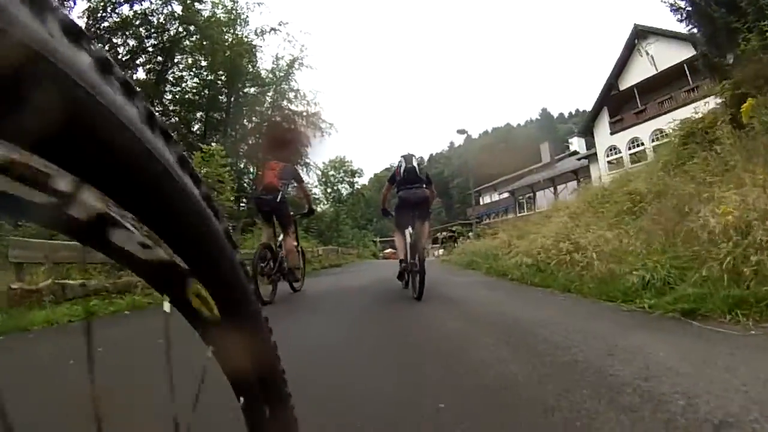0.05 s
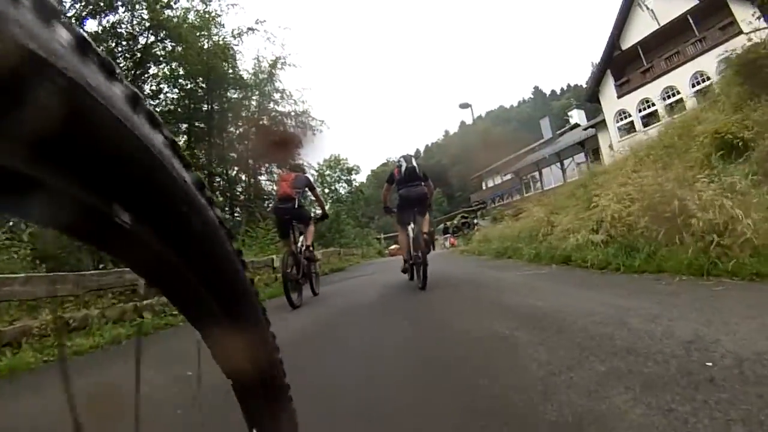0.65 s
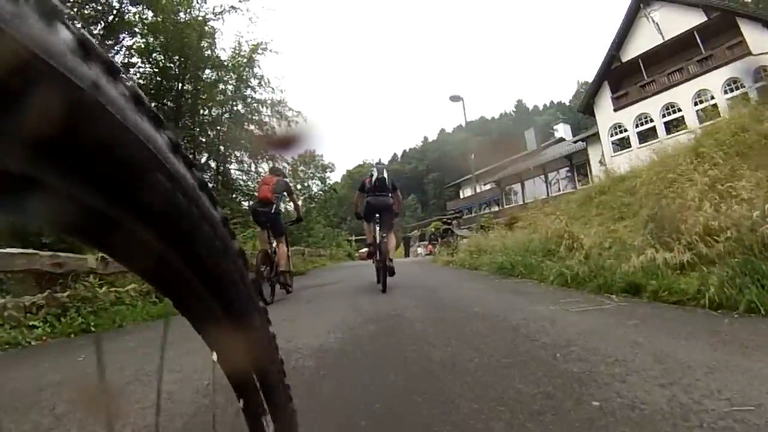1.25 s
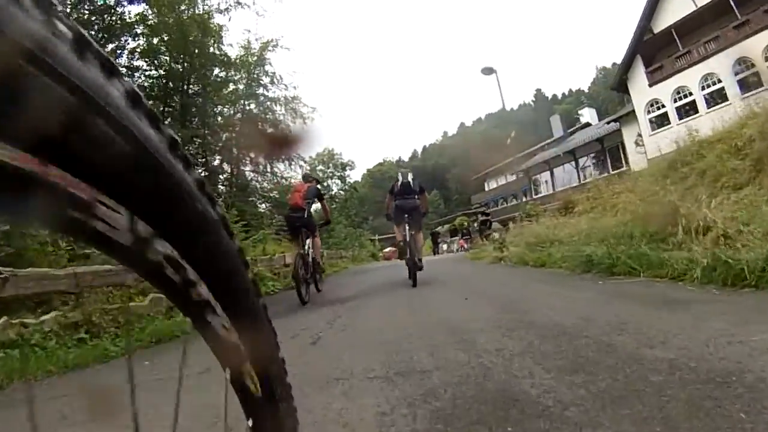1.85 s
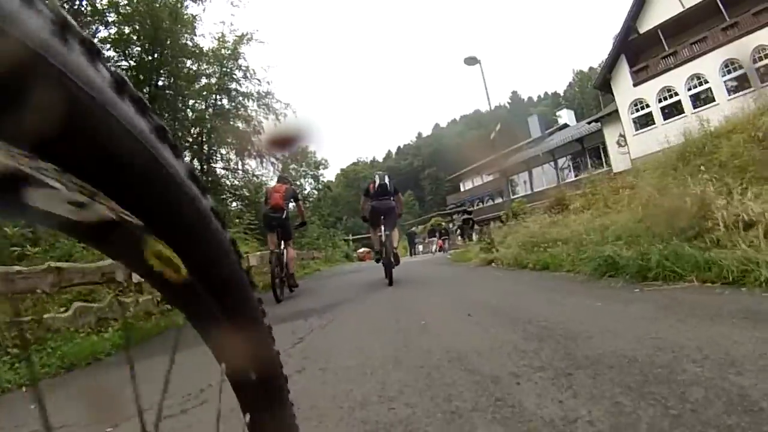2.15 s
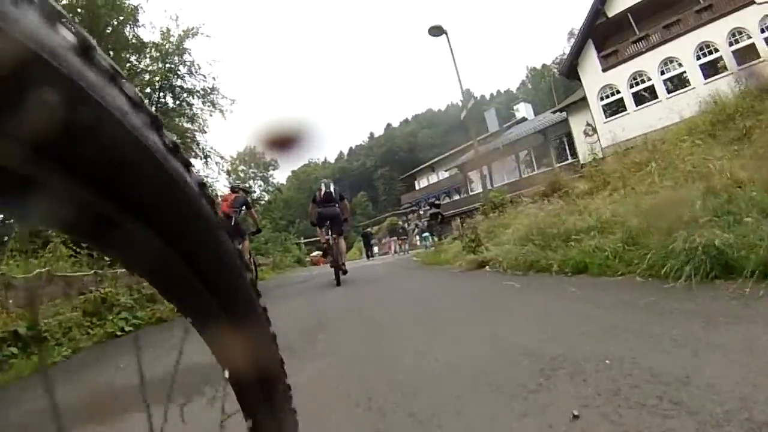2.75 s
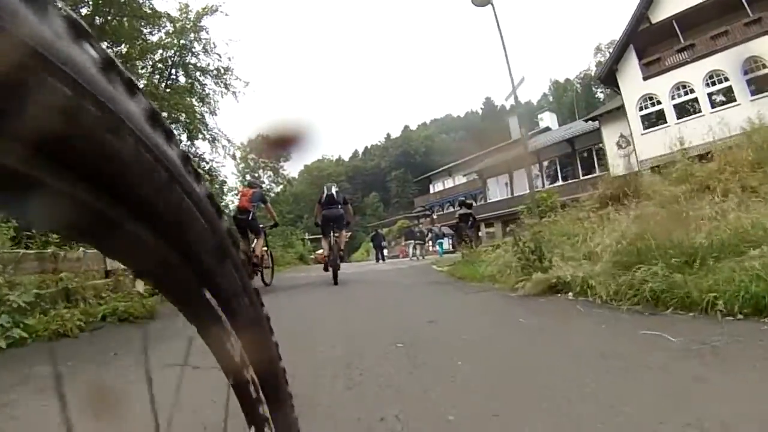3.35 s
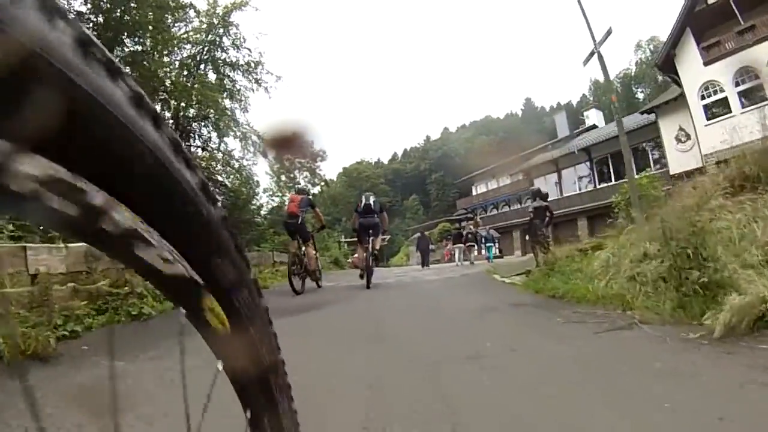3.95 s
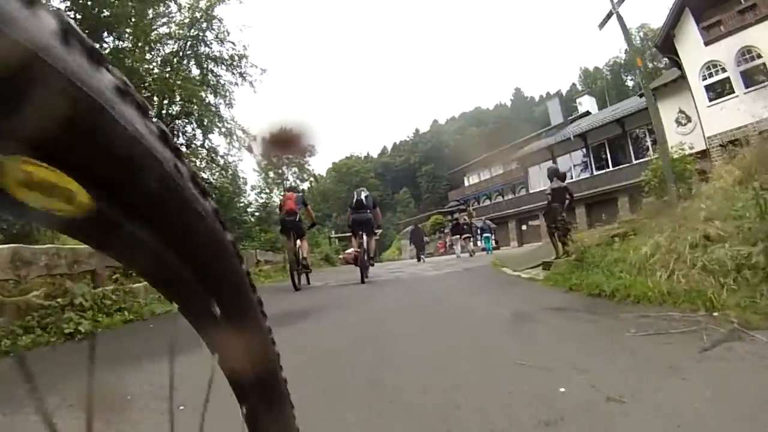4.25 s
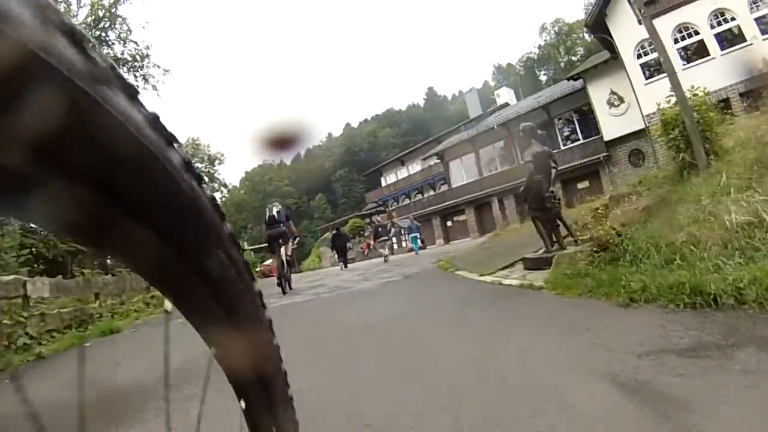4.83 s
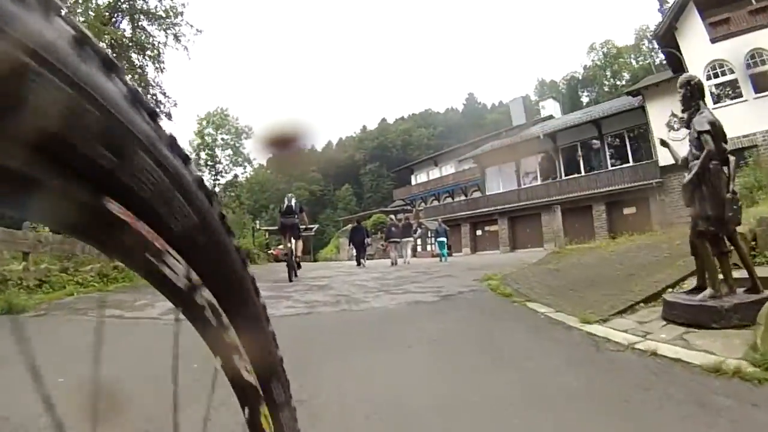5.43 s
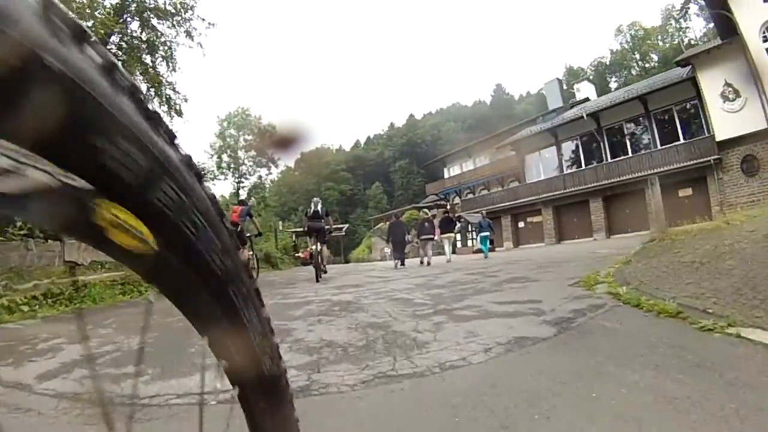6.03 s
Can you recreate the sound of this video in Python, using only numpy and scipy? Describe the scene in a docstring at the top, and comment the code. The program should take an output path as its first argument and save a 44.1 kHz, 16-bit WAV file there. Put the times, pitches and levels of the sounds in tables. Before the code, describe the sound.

Close beside a rolling bicycle wheel: low tyre hum, rapid rattling knocks, a creaking mount and rushing wind, with occasional grit clinking.

```python
"""A mountain bike rolls along a paved road, a camera fixed low beside its front wheel.
From the start the tyre's knobs drone, wind rushes over the microphone and the mount creaks.
Sharp crackling knocks come throughout; the camera's gain control ducks for an instant after each.
Grit pings off the frame, clearly at 1.5 s, at 2.7 s with a crunch of sand, and loudest at 4.2 s.
Rough patches shake the fork all along, hardest near 4.9 s; the casing growls once more at 5.9 s."""
import sys
import numpy as np
from scipy import signal
from scipy.fft import rfft, irfft, next_fast_len
from scipy.io import wavfile
from scipy.ndimage import uniform_filter1d, map_coordinates

SR = 44100
rng = np.random.default_rng(int(sys.argv[2]) if len(sys.argv) > 2 else 0)


def pcm_store(signal):
    """Save signal as 16-bit PCM."""
    levels = np.round(np.clip(np.atleast_2d(signal), -1, 1) * 32767)
    wavfile.write(sys.argv[1], SR, levels.astype(np.int16).T)


N = 272979

# wind strength: time_s, level_db
WIND_STRENGTH = [(0.03, -52.5), (0.27, -50), (0.64, -53.5), (0.78, -51), (2.14, -53), (2.65, -50.5),
                 (2.98, -52), (3.39, -51.5), (3.91, -53), (4.48, -55), (4.78, -50), (5.06, -50.5),
                 (5.54, -53), (5.74, -57), (6.03, -49), (6.15, -57)]
# wind over the microphone: freq_hz, density_db
RUSH_SPECTRUM = [(150, 6), (400, -10), (620, -3), (900, 6), (1200, 5.5), (1450, -6), (1900, -8),
                 (2250, -17.5), (2650, -25), (2950, -21), (3350, -31.5), (4000, -34.5), (5500, -42),
                 (10000, -47.5), (13000, -54.5)]
# wind on the microphone port: freq_hz, density_db
BUFFET_SPECTRUM = [(10, -43.5), (24, -6), (45, -20), (110, -2), (180, 10.5), (400, -33), (1000, -84)]
# mount creak: freq_hz, density_db
CREAK_SPECTRUM = [(300, -3), (1400, 17.5), (3000, 11.5), (5000, 1), (7500, -10), (10300, -15.5),
                  (15000, -45)]
# faint ticks and sand grains: freq_hz, density_db
TICK_SPECTRUM = [(300, -9), (1500, 22.5), (3000, 11), (4500, 0.5), (6000, -8.5), (8000, -10), (10300, -18),
                 (12000, -32.5), (15000, -44.5)]
# surges of ticking and creak: centre_s, rise_db
TICK_SURGES = [(0.088, 7.5), (0.174, 8), (0.348, 6.5), (0.644, 5), (0.844, 5.5), (0.959, 7.5), (1.135, 5),
               (1.412, 4), (1.951, 9), (2.02, 2.5), (2.177, 11), (2.278, 9.5), (2.739, 6.5), (3.065, 7.5),
               (3.799, -1), (3.918, 8), (4.589, 5), (5.02, 5), (5.137, 7.5), (5.228, 4), (5.525, 6.5),
               (5.935, 3)]
# sand under the tread: centre_s, level_db
SAND_SCRAPES = [(1.15, -59), (2.19, -60.5), (2.751, -53), (5.009, -63), (5.13, -66.5), (5.931, -62.5)]
# stones on the frame: start_s, strength_db
GRIT_HITS = [(0.141, -45.5), (0.334, -49), (0.845, -51), (1.122, -50), (1.467, -41), (2.7317, -38.5),
             (2.7687, -48), (3.913, -52), (4.079, -54), (4.2066, -35.5), (4.592, -49), (4.9869, -39),
             (5.774, -53), (5.926, -48.5)]
# frame ring: freq_hz, width_hz, gain_db
FRAME_MODES = [(1530, 330, -5), (1770, 220, -2), (2970, 500, -22)]
# fork and mount, deep boom first: freq_hz, width_hz, gain_db
FORK_MODES = [(137.9, 22, 8.5), (172.3, 36, 2.5), (202.4, 31, -1.5), (252.8, 34, 0), (289, 46, -0.5),
              (331.2, 33, -7.5)]
# slow shudder of wheel and fork: freq_hz, width_hz, gain_db
SHUDDER_MODES = [(31.56, 3, 4), (60.9, 8.6, -13), (87.7, 10, 0.5)]
# hollow tyre casing: freq_hz, width_hz, gain_db
CASING_MODES = [(431.8, 40, 3), (503.4, 48, -6), (605.5, 80, -19.5)]
# casing over bumps: centre_s, rise_db
CASING_GROWLS = [(0.23, 9), (0.295, 8.5), (0.523, 7.5), (0.703, 6), (0.766, 8), (0.828, 5.5), (0.915, 7),
                 (1.246, 4.5), (1.414, 5), (1.573, 8), (1.799, 12), (2.186, 7.5), (2.276, 4), (2.376, 7.5),
                 (2.592, 4.5), (2.859, 3.5), (3.195, 6.5), (3.33, 9.5), (3.586, 8), (3.798, 5.5),
                 (3.863, 8), (4.161, 5), (4.442, 4.5), (4.596, 10.5), (4.679, 7.5), (4.84, 10), (4.91, 9.5),
                 (5.109, 8), (5.24, 6.5), (5.368, 6), (5.92, 11.5), (6.155, 5)]
# rough asphalt: centre_s, boom_rise_db, shake_rise_db
ROUGH_PATCHES = [(0.26, -3.5, 8), (0.409, 7.5, 1.5), (0.60, -0.5, 0), (0.772, 1, 4), (0.858, 12, -1),
                 (1.351, 4.5, 5.5), (1.60, 9, 2.5), (1.8, 1, 5.5), (2.111, 9, -3), (2.4, 4.5, 3.5),
                 (2.87, 0, 0.5), (3.33, 3.5, 6), (3.857, -1, 6.5), (4.18, 3.5, 6), (4.659, 10, 4.5),
                 (4.871, 8.5, 13.5), (5.118, 9, 1.5), (5.28, 5.5, 3.5), (5.392, 2.5, 7.5), (5.899, 3, 4)]
# tread drone: time_s, pitch_hz
TREAD_PITCH = [(0.05, 176), (0.9, 181.9), (0.95, 169.2), (1.41, 177.1), (1.61, 143), (1.75, 165.8),
               (1.8, 140), (1.88, 187.7), (1.95, 166.3), (2.7, 176.7), (3.28, 163.5), (3.34, 147.4),
               (3.45, 161.3), (3.89, 160.5), (3.94, 184.4), (4.08, 169.4), (5.06, 176.6), (5.28, 143.6),
               (5.35, 162.1), (5.88, 174.9), (5.95, 152.8), (6.15, 169)]
# tread load on the road: time_s, level_db
TREAD_LOAD = [(0.0, -37.5), (0.03, -30), (0.1, -35), (0.24, -22.5), (0.27, -38), (0.31, -26), (0.52, -33),
              (0.53, -23.5), (0.71, -31.5), (0.74, -24.5), (0.96, -33.5), (1.0, -37), (1.08, -33),
              (1.14, -38), (1.28, -22), (1.31, -34.5), (1.36, -23.5), (1.55, -27.5), (1.57, -36.5),
              (1.67, -30.5), (1.71, -39.5), (2.14, -24.5), (2.17, -31.5), (2.22, -26), (2.28, -39),
              (2.38, -24.5), (2.83, -34.5), (2.86, -26.5), (3.0, -26), (3.07, -41), (3.1, -25), (3.21, -31),
              (3.22, -22.5), (3.29, -25), (3.38, -35.5), (3.45, -23.5), (3.5, -27), (3.53, -41),
              (3.64, -27), (3.65, -31), (3.69, -23), (3.79, -23.5), (3.83, -33), (4.38, -26.5),
              (5.07, -32.5), (5.1, -24), (5.31, -38.5), (5.36, -27), (5.66, -23), (5.67, -31.5),
              (5.77, -24), (5.88, -35.5), (5.98, -26), (6.02, -36.5), (6.05, -28.5), (6.19, -28)]
# crackle on each knock: freq_hz, density_db
CRACKLE_SPECTRUM = [(300, -5.5), (600, 12.5), (1100, 26.5), (1600, 22), (3000, 8.5), (5000, -1),
                    (7500, -13), (10300, -8), (12000, -21.5), (15000, -34)]
# brightest snaps in the crackle: freq_hz, density_db
SNAP_SPECTRUM = [(3000, -22), (6000, 2.5), (8000, -2), (10300, -11.5), (12000, -16), (15000, -33)]
# sharp crackling knocks: time_s, thump_db, softness_ms, crackle_db (before the cap), snap_db
SHARP_KNOCKS = [(0.0383, -14.5, 0.34, -28.5, -70.0), (0.0699, -16, 0.33, -44.5, -64.5),
                (0.0877, -24.5, 0.2, -52.5, -67), (0.1062, -12, 0.06, -46.5, -60),
                (0.1419, -19.5, 0.31, -39, -71), (0.1775, -20.0, 0.31, -46.5, -59),
                (0.2136, -19.5, 0.49, -47, -73), (0.2466, -14, 0.38, -42.5, -68),
                (0.29, -24, 0.31, -41, -64), (0.312, -18.5, 0.43, -51, -62),
                (0.3469, -16.5, 0.26, -52, -58.5), (0.359, -12, 0.33, -44, -60.0),
                (0.4117, -21.5, 0.47, -45.5, -63.5), (0.4529, -21.5, 0.41, -44.5, -71.5),
                (0.484, -15.5, 0.3, -42, -68.5), (0.543, -18, 0.68, -45, -66.5),
                (0.564, -21.5, 0.3, -58, -63.5), (0.6051, -18, 0.34, -51, -61.5),
                (0.641, -13, 0.55, -45.5, -59.5), (0.6571, -25, 0.37, -51, -65.5),
                (0.6721, -15, 0.43, -43, -71.5), (0.7059, -21.5, 0.47, -48.5, -61),
                (0.7842, -20.5, 0.85, -42, -68), (0.8441, -15.5, 0.48, -41.5, -68.5),
                (0.8665, -20.5, 0.39, -41.5, -69.5), (0.9281, -15.5, 0.35, -42.5, -73),
                (0.9672, -15.5, 0.36, -46.5, -58), (1.0037, -18.5, 0.22, -41.5, -68.5),
                (1.0618, -17, 0.39, -46, -68), (1.0926, -13, 0.25, -43, -59.5),
                (1.115, -17, 0.3, -42, -61.5), (1.1481, -19, 0.29, -51.5, -57.5),
                (1.163, -21.5, 0.38, -46.5, -67), (1.1813, -21, 0.32, -42, -71),
                (1.225, -18.5, 0.35, -45, -62.0), (1.2611, -18, 0.41, -49.5, -63.5),
                (1.3115, -16, 0.12, -48.5, -61), (1.4086, -18, 0.42, -49, -68),
                (1.4428, -16.5, 0.4, -44, -65), (1.4586, -14.5, 0.37, -39.5, -68),
                (1.5065, -13.5, 0.28, -39, -76.5), (1.6109, -17, 0.33, -47.0, -69.5),
                (1.6366, -19.5, 0.37, -47.5, -74), (1.6681, -15.0, 0.3, -44.5, -66.5),
                (1.7063, -20, 0.3, -41.5, -70.5), (1.7762, -20, 0.39, -46, -61),
                (1.806, -15.5, 0.33, -41.0, -67), (1.8483, -15, 0.5, -46.5, -60),
                (1.8942, -17, 0.43, -41.5, -64.0), (1.9219, -12.5, 0.39, -41.5, -71.5),
                (1.9732, -16.5, 0.28, -32, -68.5), (2.0207, -19.5, 0.32, -45, -60),
                (2.0579, -16.5, 0.35, -47.5, -62), (2.1262, -14.5, 0.48, -45.5, -66.5),
                (2.1438, -20, 0.48, -45, -70.5), (2.1653, -18.5, 0.38, -51, -57.5),
                (2.1998, -17, 0.42, -50.5, -64), (2.2195, -19.5, 0.44, -45, -63.0),
                (2.2375, -13, 0.32, -38.5, -71.5), (2.2814, -19.5, 0.43, -43, -67.5),
                (2.3123, -9.5, 0.15, -38.5, -73.5), (2.4243, -19, 0.85, -50.5, -63.5),
                (2.4541, -16.5, 0.45, -43, -67.5), (2.4957, -15.5, 0.37, -57.5, -62),
                (2.5273, -19, 0.35, -51, -61.5), (2.5568, -17.0, 0.75, -55, -62.5),
                (2.6024, -15.5, 0.36, -44, -72.5), (2.636, -19.5, 0.41, -43.5, -71.5),
                (2.694, -18, 0.41, -51.5, -61.0), (2.7256, -18, 0.37, -49, -64.5),
                (2.741, -23.5, 0.48, -46, -71.5), (2.7559, -15.5, 0.37, -61.5, -58.5),
                (2.7721, -27, 0.32, -47, -77), (2.7908, -14.5, 0.25, -40, -65.5),
                (2.824, -17.5, 0.06, -49.5, -69.5), (2.8677, -12.5, 0.17, -40.5, -70.0),
                (2.9121, -13.5, 0.32, -47, -62), (2.9623, -13, 0.39, -45.0, -62.5),
                (3.0016, -14.5, 0.51, -46, -70.5), (3.0276, -18, 0.62, -41.5, -75.5),
                (3.069, -18.5, 0.32, -44, -62), (3.0938, -17.5, 0.36, -48, -64),
                (3.1658, -14.5, 0.34, -51, -63.5), (3.1986, -17.5, 0.42, -48, -66),
                (3.2377, -18.5, 0.44, -44.0, -73), (3.2576, -11.5, 0.34, -38, -68.5),
                (3.3467, -14, 0.2, -32, -70.5), (3.3832, -17, 0.41, -45.5, -66.5),
                (3.4123, -16, 0.35, -44, -65.5), (3.4701, -18, 0.29, -48.5, -68),
                (3.4934, -15.5, 0.65, -47, -66), (3.539, -17.5, 0.29, -47, -71),
                (3.594, -14.5, 0.51, -48, -66), (3.6343, -13.5, 0.38, -48, -59.5),
                (3.6859, -14.5, 0.42, -45.5, -61.5), (3.7162, -20.5, 0.51, -44.5, -67.5),
                (3.8034, -16, 0.42, -41.5, -65), (3.8785, -17.5, 0.5, -42, -63),
                (3.9237, -18.5, 0.33, -47.5, -60), (3.9422, -21.0, 0.24, -47, -60.5),
                (3.9753, -15.5, 0.06, -43, -62), (4.0094, -18, 0.34, -51, -64.5),
                (4.044, -21.5, 0.46, -48.5, -58), (4.086, -19.5, 0.39, -47, -66),
                (4.1133, -16, 0.48, -42.5, -62.5), (4.1787, -14.5, 0.36, -43, -72),
                (4.2214, -13, 0.3, -43.0, -67), (4.2588, -17.5, 0.33, -44, -64.5),
                (4.295, -13, 0.31, -43, -72.5), (4.3442, -10.5, 0.08, -43.5, -68),
                (4.4058, -18, 0.37, -44.0, -62.5), (4.474, -16.5, 0.48, -46, -70.5),
                (4.523, -17, 0.38, -45.0, -61.5), (4.5566, -19.5, 0.36, -49, -64.5),
                (4.6952, -18.5, 0.39, -50, -66), (4.718, -12.5, 0.38, -40.5, -72),
                (4.7598, -18, 0.14, -45, -64), (4.8066, -17, 0.4, -49, -68),
                (4.8656, -19, 0.23, -49.5, -67), (4.8859, -19, 0.33, -45, -68),
                (4.9229, -12, 0.06, -47, -62.5), (4.9574, -20, 0.34, -49, -59.0),
                (4.9829, -16.5, 0.45, -50.5, -59.5), (4.9985, -17.5, 0.47, -51, -66.5),
                (5.0189, -22, 0.24, -42.5, -60.5), (5.0661, -20, 0.69, -45, -69.5),
                (5.1223, -17.5, 0.71, -47, -64.5), (5.1488, -16.5, 0.35, -42, -68),
                (5.168, -13, 0.14, -49, -68.0), (5.2153, -15, 0.43, -44, -63.5),
                (5.2886, -21, 0.67, -48.5, -69), (5.3322, -21, 0.58, -50, -59),
                (5.3929, -13.5, 0.32, -41.5, -65.5), (5.4345, -17, 0.45, -42, -73.5),
                (5.4471, -15.5, 0.42, -48, -63.5), (5.481, -16, 0.44, -48, -64),
                (5.5396, -18, 0.31, -42, -68), (5.5606, -15, 0.42, -48.5, -62.5),
                (5.5972, -20.5, 0.4, -53, -60), (5.6564, -18.5, 0.38, -47.5, -58),
                (5.688, -18.0, 0.41, -52, -61.5), (5.7308, -15, 0.66, -50.5, -65.5),
                (5.778, -13.5, 0.46, -40, -71.5), (5.8217, -21.5, 0.55, -45, -66.5),
                (5.8477, -22, 0.38, -45.5, -65), (5.8953, -19.5, 0.42, -49.5, -59.5),
                (5.9303, -23.5, 0.45, -32, -69.5), (5.9487, -16.5, 0.36, -46, -69.5),
                (5.9764, -12.5, 0.27, -42.5, -71.5), (6.0135, -18.0, 0.28, -41.5, -69.5),
                (6.0577, -16, 0.38, -44.5, -70.5), (6.0997, -14, 0.06, -43.5, -74.5)]

SURGE_HALF_S = 0.028


def amp(db):
    """Decibels to gain."""
    return 10 ** (np.asarray(db) / 20)


def unit(x):
    """Scale to rms 1."""
    return x / np.sqrt(np.mean(x ** 2) + 1e-20)


def evened(x, samples):
    """Noise with its chance swells levelled; rms 1."""
    return unit(x / np.sqrt(np.abs(uniform_filter1d(x ** 2, size=samples)) + 1e-6))


def curve(rows):
    """Per-sample curve through (time_s, value) rows."""
    return np.interp(np.arange(N) / SR, *np.transpose(rows))


def swells(rows, half_s):
    """Bell curves from (centre_s, height) rows."""
    t = np.arange(N) / SR
    return sum(height * np.exp(-((t - centre_s) / half_s) ** 2) for centre_s, height in rows)


def wobble(rate_hz):
    """Smooth random curve with knots at rate_hz."""
    knots = rng.standard_normal(int(N * rate_hz / SR) + 4)
    return map_coordinates(knots, [np.arange(N) * rate_hz / SR])


def filtered(x, response):
    """Apply a complex frequency response."""
    size = next_fast_len(N + SR // 2)
    return irfft(rfft(x, size) * response(np.fft.rfftfreq(size, 1 / SR)), size)[:N]


def coloured(x, spectrum):
    """Apply (freq_hz, density_db) rows on a log frequency axis."""
    freq_hz, db = np.transpose(spectrum)
    return filtered(x, lambda hz: amp(np.interp(np.log(hz + 1), np.log(freq_hz), db)))


def shaken(modes):
    """Steep-skirted resonances, each driven by its own noise; rms 1."""
    def band(hz, width_hz):
        bandpass = lambda f: 1j * f * width_hz / (hz * hz - f * f + 1j * f * width_hz)
        return filtered(rng.standard_normal(N), lambda f: bandpass(f) ** 2)
    return unit(sum(amp(db) * band(hz, width_hz * np.sqrt(2)) for hz, width_hz, db in modes))


def add(track, start_s, sound):
    """Mix a short sound in."""
    part = track[max(round(start_s * SR), 0):][:len(sound)]
    part += sound[:len(part)]


def wind(trim_db=1.24, gust_db=0.9, flutter_db=3.5, buffet_db=-34):
    """Air rushes past the housing and buffets the microphone port."""
    rush_db = curve(WIND_STRENGTH) + trim_db + gust_db * wobble(12) + flutter_db * wobble(90)
    rush = amp(rush_db) * unit(coloured(rng.standard_normal(N), RUSH_SPECTRUM))
    buffet = amp(buffet_db + wobble(51)) * unit(coloured(rng.standard_normal(N), BUFFET_SPECTRUM))
    return rush + buffet


def faint_ticks(sway, level_db=-67.5, scatter_db=4.3):
    """Faint ticks at the turn of each swing, louder on big swings."""
    turns = np.diff(np.sign(np.gradient(sway)), prepend=0) != 0
    ticks = turns * np.sign(sway) * np.abs(sway) ** .6 * amp(scatter_db * rng.standard_normal(N))
    envelope = amp(level_db + swells(TICK_SURGES, SURGE_HALF_S) + wobble(22))
    return envelope * unit(coloured(ticks, TICK_SPECTRUM))


def mount_creak(level_db=-63, median_slip_hz=169.9, clump_db=2, scatter_db=3):
    """The mount sticks and slips at an uneven rate: fine, dry clicks."""
    slip_hz = median_slip_hz * np.exp(0.6 * wobble(500))
    slips = np.diff(np.floor(np.cumsum(slip_hz) / SR), prepend=0)
    size_db = clump_db * wobble(110) + scatter_db * rng.standard_normal(N)
    clicks = slips * rng.choice([-1, 1], N) * amp(size_db)
    envelope = amp(level_db + .5 * swells(TICK_SURGES, SURGE_HALF_S))
    return envelope * unit(coloured(clicks, CREAK_SPECTRUM))


def sand(grain_db=5):
    """Sand crunches briefly under the tread in uneven grains."""
    grains = rng.standard_normal(N) * amp(grain_db * wobble(700))
    envelope = swells([(centre_s, amp(db)) for centre_s, db in SAND_SCRAPES], half_s=0.027)
    return envelope * unit(coloured(grains, TICK_SPECTRUM))


def grit(boost_db=4.5, attack_s=0.001, t60_s=0.032):
    """Stones flung by the tread clink against the frame."""
    envelope, t = np.zeros(N), np.arange(SR // 10) / SR
    clack = (1 - np.exp(-t / attack_s)) * amp(-60 * t / t60_s)
    for start_s, strength_db in GRIT_HITS:
        add(envelope, start_s, amp(strength_db + boost_db) * clack)
    return envelope * evened(shaken(FRAME_MODES), samples=160)


def tread_drone(trim_db=-2, flutter_db=2, jitter_rad=0.18, wander_hz=1):
    """Knobs slap the road one after another: an unsteady tone."""
    pitch_hz = curve(TREAD_PITCH) + wander_hz * wobble(16)
    phase = 2 * np.pi * np.cumsum(pitch_hz) / SR
    # bend the phase so that knocks fall near zero crossings
    t, knock_s = np.arange(N) / SR, np.sort(np.transpose(SHARP_KNOCKS)[0])
    drift_rad = np.unwrap(2 * np.interp(knock_s, t, phase)) / 2
    phase = phase - np.interp(t, knock_s, drift_rad) + jitter_rad * wobble(45)
    level_db = curve(TREAD_LOAD) + trim_db + flutter_db * wobble(30)
    return amp(level_db) * np.sqrt(2) * np.sin(phase)


def road_rumble(boom_db=-35, fork_db=-33.5, casing_db=-45, shudder_db=-37.5, flutter_db=2):
    """Road roughness rings fork, casing and wheel; patches and bumps swell fork and casing."""
    centre_s, *rises_db = np.transpose(ROUGH_PATCHES)
    boom_rise_db, shake_rise_db = [swells(zip(centre_s, db), half_s=0.055) for db in rises_db]
    growl_db = swells(CASING_GROWLS, half_s=0.038)
    boom = amp(boom_db + boom_rise_db) * evened(shaken(FORK_MODES[:1]), samples=2200)
    shake_db = fork_db + shake_rise_db + flutter_db * wobble(14)
    fork = amp(shake_db) * evened(shaken(FORK_MODES[1:]), samples=1100)
    casing = amp(casing_db + growl_db) * evened(shaken(CASING_MODES), samples=1400)
    return boom + fork + casing + amp(shudder_db) * shaken(SHUDDER_MODES)


def knock_shape(t, lead_s=0.00093, rise_s=0.00063, fall_s=0.00039,
                stuck_s=0.00048, rebound_s=0.0003, settle_s=0.001, rebound_gain=1.2):
    """A big swing hits its limit, sticks for an instant, then rebounds."""
    peak = np.exp(-np.abs(t + lead_s) / np.where(t < -lead_s, rise_s, fall_s))
    freed_s = np.maximum(t - stuck_s, 0)
    rebound = rebound_gain * (1 - np.exp(-freed_s / rebound_s)) * np.exp(-freed_s / settle_s)
    return rebound - peak


def with_knocks(sway, gap_s=0.002, burst_rise_s=0.0011, burst_fall_s=0.0013, crackle_cap_db=-40):
    """Each knock replaces one swing of the sway and crackles; softer ones thud."""
    thumps, crackle_env, snap_env, gaps = np.zeros((4, N))
    t = np.arange(-(SR // 100), SR // 100) / SR
    heading = np.sign(np.gradient(uniform_filter1d(sway, size=60)))
    shape = knock_shape(t)
    burst = np.exp(-(t / np.where(t < 0, burst_rise_s, burst_fall_s)) ** 2)
    for time_s, thump_db, softness_ms, crackle_db, snap_db in SHARP_KNOCKS:
        smoothing = np.exp(-.5 * (1000 * t / max(softness_ms, .09)) ** 2)
        swing = signal.fftconvolve(shape, smoothing, "same")
        direction = heading[min(round(time_s * SR), N - 1)]  # follows the sway's slope
        start_s = time_s + t[0]
        add(thumps, start_s, direction * amp(thump_db) * swing / np.abs(swing).max())
        add(gaps, start_s, np.exp(-(t / gap_s) ** 2))
        add(crackle_env, start_s, amp(min(crackle_db, crackle_cap_db)) * burst)
        add(snap_env, start_s, amp(snap_db) * burst)
    crackles = crackle_env * evened(coloured(rng.standard_normal(N), CRACKLE_SPECTRUM), samples=120)
    snaps = snap_env * evened(coloured(rng.standard_normal(N), SNAP_SPECTRUM), samples=120)
    return sway * (1 - np.clip(gaps, 0, 1)) + thumps + crackles + snaps


def scene():
    """All sources at one microphone."""
    sway = tread_drone() + road_rumble()
    return (with_knocks(sway) + wind() + faint_ticks(sway) + mount_creak() + grit() + sand())[None]


def gain_control(x, threshold_db=-58, mids_db=-16, max_duck_db=14, delay_s=0.004, release_s=0.021):
    """A sharp knock ducks the gain a moment later, the harder the deeper; recovery is quick."""
    sidechain = filtered(x, lambda hz: (hz > 4500) + amp(mids_db) * (hz > 650))
    power = np.abs(uniform_filter1d(sidechain ** 2, size=44)) / amp(threshold_db) ** 2
    trigger = power / (1 + power)
    # peak hold, exponential release
    fade = np.arange(N) / SR / release_s
    held = np.exp(np.maximum.accumulate(np.log(trigger + 1e-9) + fade) - fade)
    delayed = np.interp(np.arange(N) - delay_s * SR, np.arange(N), held)
    return x * amp(-max_duck_db * uniform_filter1d(delayed, size=90))


def record(dry, gain_db=3, ceiling=0.26, cutoff_hz=14900):
    """Camera: ducking, soft clipping, low-pass."""
    ducked = amp(gain_db) * gain_control(dry[0])
    clipped = ducked / (1 + np.abs(ducked / ceiling) ** 6) ** (1 / 6)
    return signal.sosfilt(signal.butter(12, cutoff_hz, fs=SR, output="sos"), clipped)[None]


dry = scene()
out = record(dry)
pcm_store(out)
```